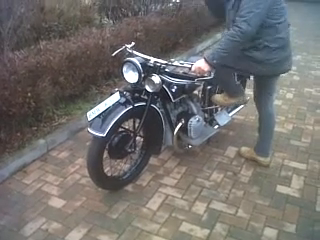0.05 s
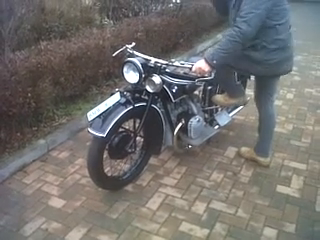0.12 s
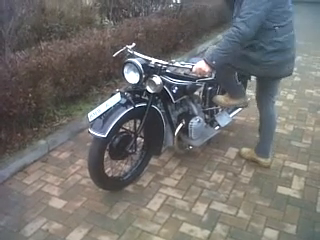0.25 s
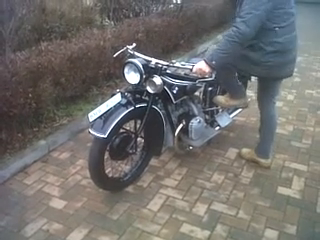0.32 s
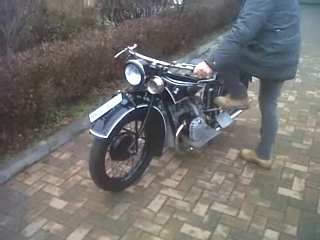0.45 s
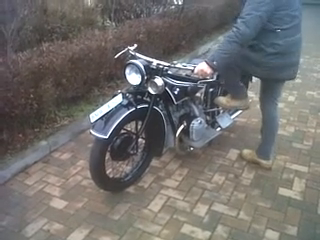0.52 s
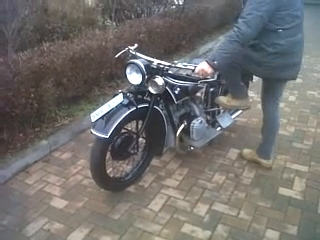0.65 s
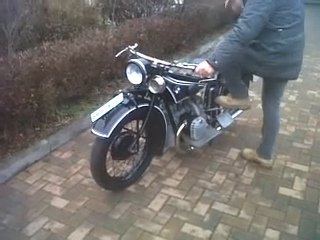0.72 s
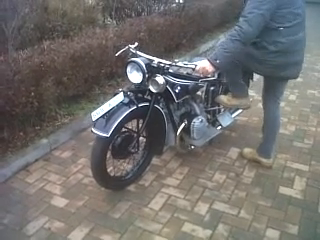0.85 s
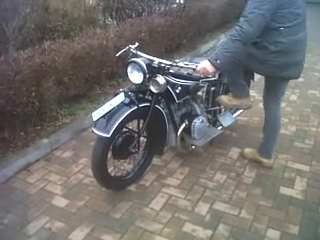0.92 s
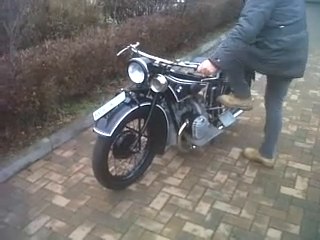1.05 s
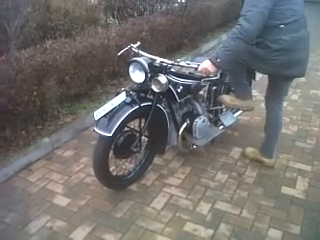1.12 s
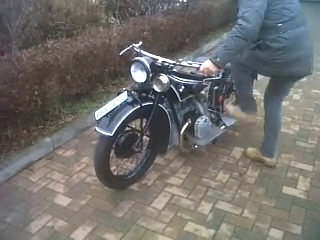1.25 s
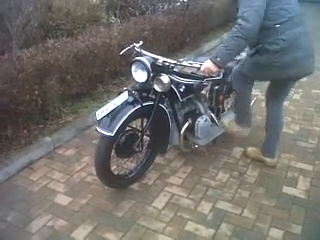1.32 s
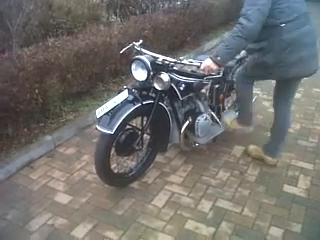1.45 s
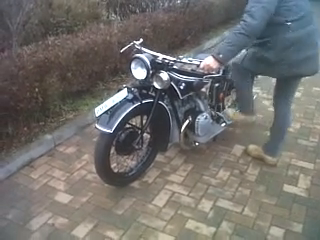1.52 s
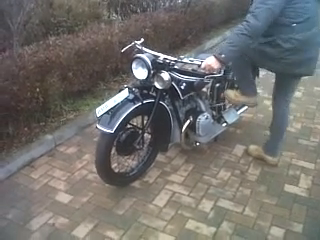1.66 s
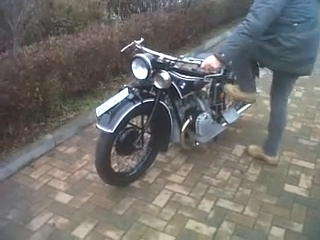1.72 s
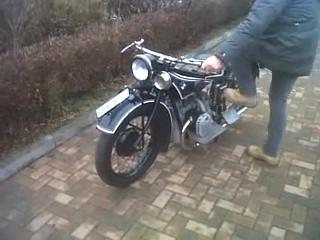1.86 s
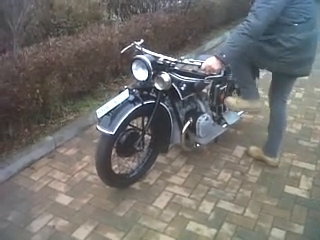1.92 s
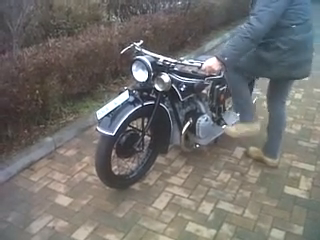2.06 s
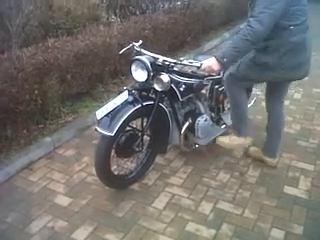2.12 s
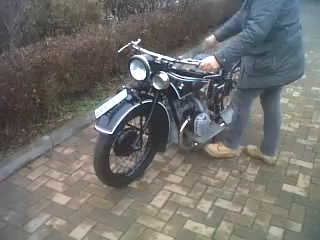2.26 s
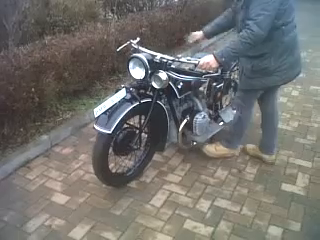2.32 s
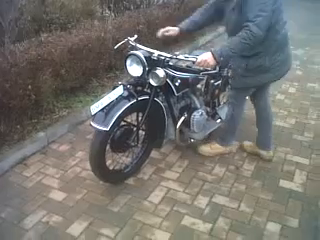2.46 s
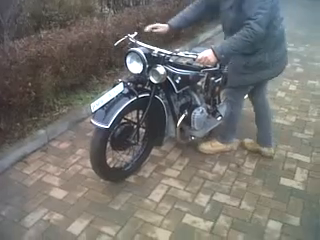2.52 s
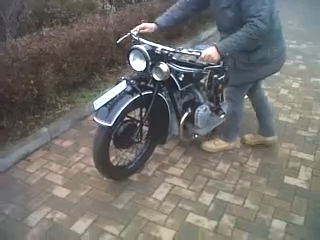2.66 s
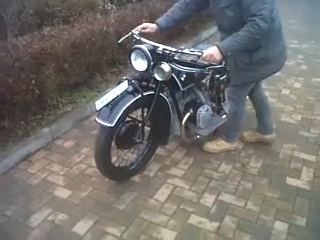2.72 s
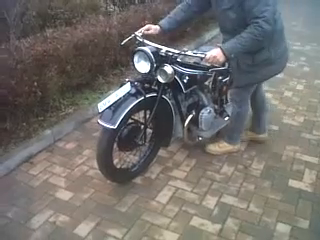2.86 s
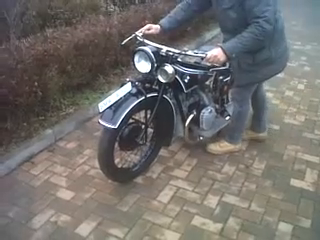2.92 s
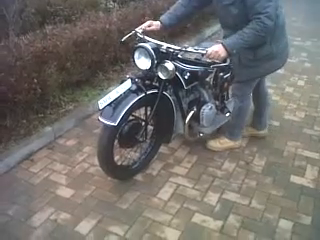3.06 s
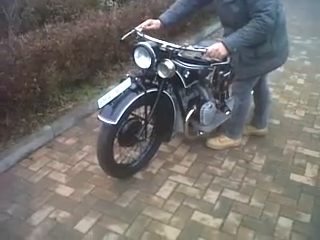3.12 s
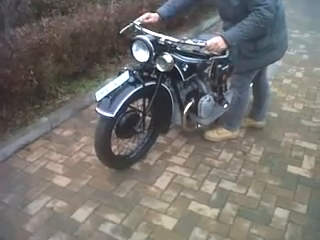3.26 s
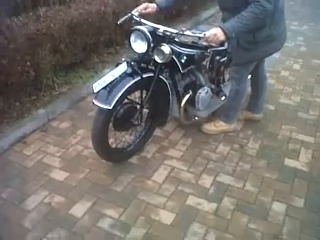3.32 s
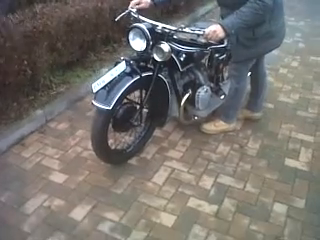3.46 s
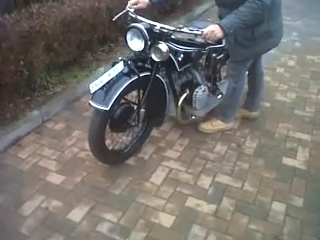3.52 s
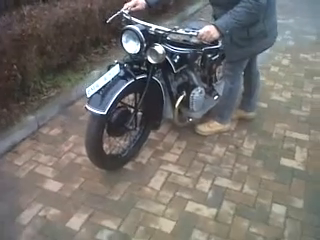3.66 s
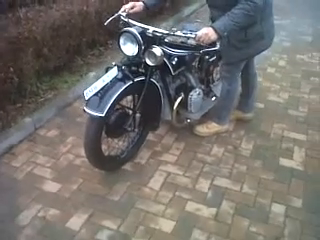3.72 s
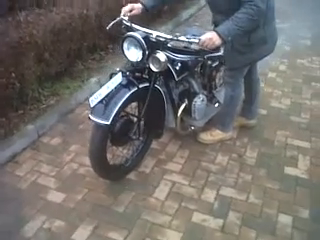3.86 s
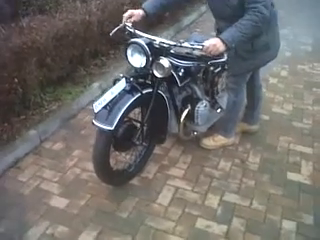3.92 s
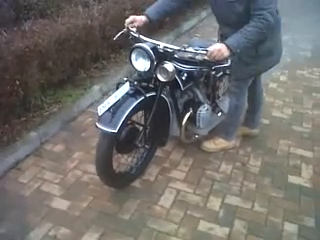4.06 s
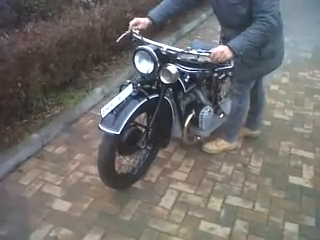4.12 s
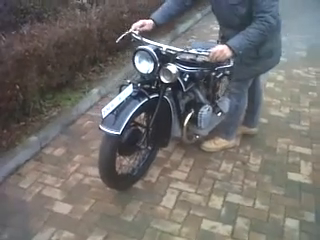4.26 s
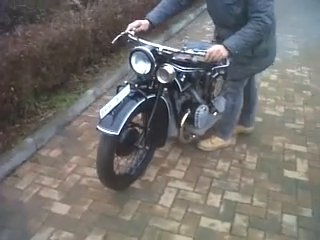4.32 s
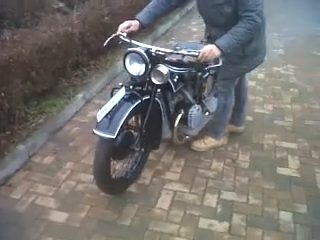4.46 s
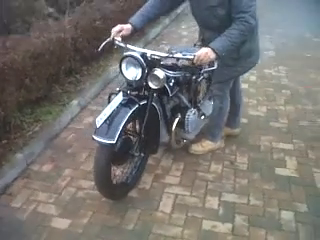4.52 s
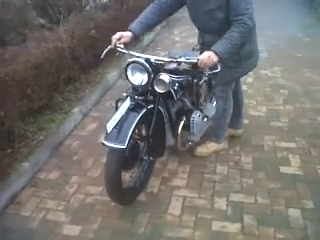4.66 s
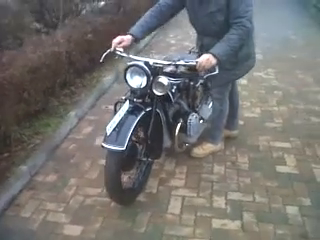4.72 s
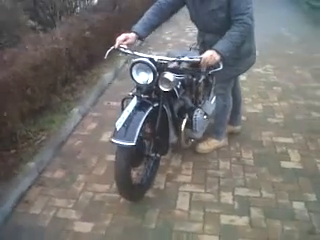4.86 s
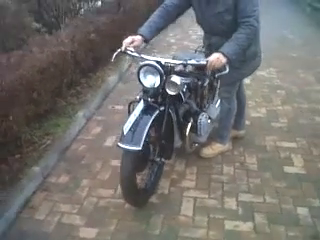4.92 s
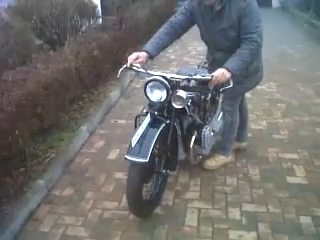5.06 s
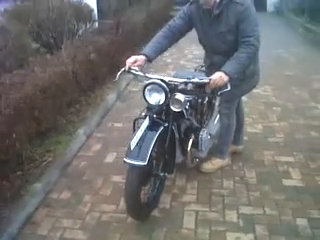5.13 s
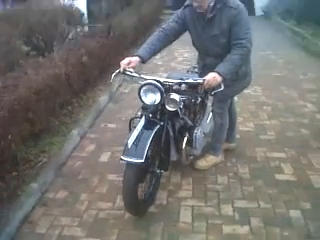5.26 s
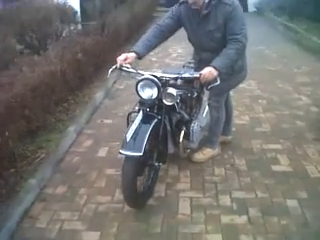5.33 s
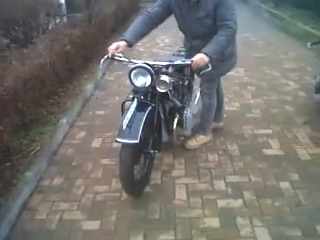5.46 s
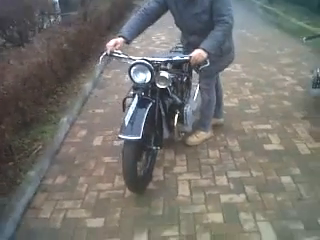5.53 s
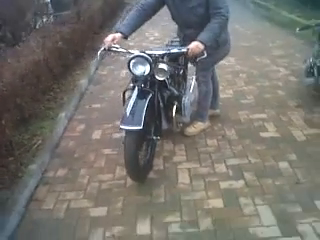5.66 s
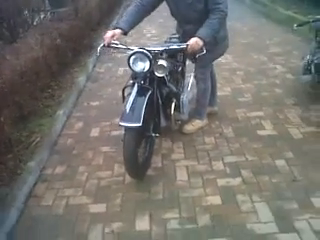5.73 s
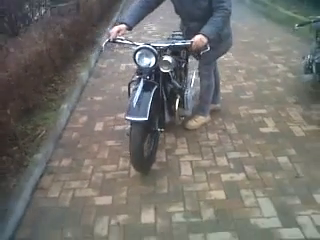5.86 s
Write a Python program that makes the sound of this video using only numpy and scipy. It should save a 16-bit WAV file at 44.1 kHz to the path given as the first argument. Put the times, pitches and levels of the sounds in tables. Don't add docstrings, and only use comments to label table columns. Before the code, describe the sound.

A kick-start clunk and ratchet whir lead to slow thumping exhaust puffs that quicken into two raspy revs with metallic clatter.

```python
import sys
import numpy as np
from scipy import signal
from scipy.fft import rfft, irfft
from scipy.io import wavfile
from scipy.ndimage import uniform_filter1d

SR = 44100
rng = np.random.default_rng(int(sys.argv[2]) if len(sys.argv) > 2 else 0)


def int16_out(signal):
    q = np.round(np.clip(np.atleast_2d(signal).T, -1, 1) * 32767)
    wavfile.write(sys.argv[1], SR, q.astype(np.int16))


def attenuation_scalar(level_db):
    decades = np.asarray(level_db, float) / 20
    return 10 ** decades


N = 259749

# (time [s], rate [strokes/s])
SPEED = [(1.5, 11.06), (2.04, 12.47), (2.36, 15.75), (2.77, 18.55), (2.771, 19.95), (3.26, 27.58),
         (3.64, 36.81), (3.8, 37.0), (4.09, 43.48), (4.23, 40.08), (4.39, 35.46), (4.52, 36.75),
         (4.8, 42.97), (4.82, 39.44), (4.98, 37.3), (5.32, 42.17), (5.46, 41.89), (5.89, 35.44)]
FIRST_STROKE_S, IDLE_PER_S = 1.4981, 39
# (time [s], echo level [dB])
BURN = [(1.5, -24.5), (1.7, -23.5), (2.05, -22), (2.35, -20), (2.75, -18), (2.9, -18), (3.3, -13.5),
        (3.6, -10.5), (4.1, -9.5), (4.7, -12.5), (5.2, -16), (5.89, -11)]
CATCHES_S = [3.673, 3.835, 3.938, 4.035, 4.439, 4.549, 4.652, 4.75, 5.005, 5.109, 5.21, 5.306, 5.45, 5.647,
             5.86]
FEEBLE_S = [2.235, 3.0, 3.237, 3.376, 3.501, 3.725, 4.491, 4.701, 5.156, 5.519, 5.546, 5.595, 5.62, 5.697,
            5.721, 5.75, 5.83]
HALF_BURNS_S = [3.563, 5.256, 5.352, 5.399, 5.495]
# (from [s], to [s])
COASTING = [
    (4.17, 4.42),
    (4.79, 4.96),
]
# (time [s], puff [dB], echo [dB])
BURN_DEVIATIONS = [(1.498, 1.5, 0.5), (1.675, 0.0, 1), (1.846, -3.5, 0.5), (2.01, -5.5, 1), (2.164, -1, 1),
                   (2.302, -2.5, 2), (2.429, 0.5, 0.5), (2.55, 1, 1), (2.664, 0.0, 0.5), (2.774, -2.5, 2.5),
                   (2.87, 3, 0.5), (2.96, 0.0, -1), (3.003, 5.5, -9), (3.045, 1, 1), (3.126, 5, -1.5),
                   (3.202, 2, -1), (3.239, 6, 0.5), (3.276, -0.5, 1), (3.345, 1.5, -0.5), (3.378, 2, 1.5),
                   (3.411, 0.5, 2.5), (3.473, 1.5, 1.5), (3.503, 2, 2), (3.533, 1.5, -0.5), (3.562, 1, 8),
                   (3.59, 1.5, 0.5), (3.645, -2, 0.5), (3.673, -0.5, -2.5), (3.7, 0.0, -1.5), (3.727, 2, -1),
                   (3.754, -1.5, -0.5), (3.808, -2.5, 1), (3.835, -1, -6), (3.861, 0.0, 1), (3.912, 4, 0.5),
                   (3.937, 2.5, 1), (3.962, 2, 0.0), (4.011, 4, 1), (4.035, 4.5, -2), (4.058, -3, -0.5),
                   (4.104, 1.5, -2), (4.151, -1, -3),
                   (4.439, -2, 1), (4.466, 1.5, -5), (4.494, 2, 1), (4.521, 1, -1.5), (4.548, 1, -2.5),
              (4.575, -3, 0.0), (4.626, 1.5, 3), (4.652, 2.5, -1), (4.677, 3.5, 2), (4.702, -4, -3.5),
              (4.726, 3, 1.5), (4.75, 2, -1), (4.774, -2.5, -0.5), (4.978, 3, 2), (5.004, 1, -2),
              (5.031, -6, 2.5), (5.083, -5, 3.5), (5.109, 0.5, 0.0), (5.134, 1, 0.5), (5.159, -3, 1.5),
              (5.184, 2.5, 4.5), (5.209, 2, -1.5), (5.233, 0.0, 0.5), (5.258, -5, 1), (5.282, 1.5, 2.5),
              (5.306, 3, -1), (5.33, -1, -2), (5.353, -7, 1.5), (5.377, 0.5, 2), (5.401, 0.0, -6.5),
              (5.425, 0.5, 1.5), (5.449, 3, -2), (5.472, 0.0, -0.5), (5.496, -1, 4.5), (5.521, 0.5, 1.5),
              (5.57, 1.5, -0.5), (5.62, -2, 0.0), (5.646, -0.5, -2), (5.671, -1, 2.5), (5.724, 4, -0.5),
              (5.777, -1.5, -1), (5.831, 3, -3), (5.859, -4, -3.5), (5.887, -1, -9)]
HALF_BURN_DB = -18.5
PUFF_OVER_ECHO_DB = -1.8
SLOW_BURN_DB, SLOW_PUFF_LOSS = -19.5, 0.43
FEEBLE_ECHO_DB, FEEBLE_PUFF_DB = -6, -28.5
UNBURNT_DB, UNBURNT_DB_PER_DECADE, FIRST_UNBURNT_DB = -21.5, 29.5, 6
COAST_ECHO_DB, NO_ECHO_DB = -27.5, -56.5
COAST_LAG_S, COAST_WIDER = .005, 1.05
COAST_PUFF_DB, COAST_FIRST_DB, COAST_SAG_DB_PER_S, LATE_COAST_DB = -15.5, 2, -12, -2.5

# (time [s], round trip [ms], late echoes [dB])
PIPE = [
    (1.5, 10.3, 3.5),
    (1.8, 11.0, 3.5),
    (2.65, 9.35, 3.5),
    (2.9, 8.27, -14.0),
    (3.3, 7.3, -14.0),
    (4.0, 6.82, -4.0),
    (4.6, 6.95, -4.0),
    (5.4, 6.92, -14.0),
    (5.89, 7.59, -14.0),
]
PUFF = [(-.1, .2, .45), (-.28, -.42, .11), (0, .85, .142), (-.02, .16, .06), (.42, -.44, .147),
        (1.09, -.31, .15), (1.62, .38, .146), (2.35, .12, .22)]
ECHOES = [(-.1, -.2, .45), (.67, -.51, .134), (1.03, .9, .168), (1.46, .52, .14), (1.86, .45, .163),
          (2.25, .49, .148), (2.81, .28, .19)]
# (frequency [cycles/round trip], level [dB], t60 [s])
SILENCER = [(1.5, -15, 0.19), (1.31, -18, 0.17), (1.9, -14.5, 0.11), (2.2, -4, 0.063), (0.99, -22.5, 0.75),
            (4.1, -22, 0.11), (1.2, -31, 0.017)]
# (frequency [cycles/round trip], level [dB], t60 [s])
PIPE_RING = (1.06, -13, .12)
# (time [s], silencer [dB], tailpipe bark [dB])
BEARING = [
    (1.5, -7, -30.5),
    (3.0, 9, -27),
    (3.4, 1, -14),
    (4.6, 3.5, -17),
    (5.1, 4.5, -11.5),
    (5.89, 1, -9.5),
]
# (frequency [Hz], level [dB], t60 [s])
TAILPIPE = [(636.5, -0.4, 0.053), (464.6, -4.5, 0.081), (377.3, -0.5, 0.052)]

# (time [s], level [dB])
THROTTLE = [(3.35, 0.5), (3.505, 12), (3.516, 22), (3.77, 22.5), (3.98, 24.5), (4.11, 20), (4.36, 14),
            (4.57, 8.5), (4.8, -0.5), (5.66, -4.5), (5.89, -10.5)]
# (time [s], level [dB])
STARTER = [
    (1.36, -23),
    (1.43, -14),
    (1.474, -3),
    (1.482, 20.5),
    (1.6, -2),
    (1.686, 14.5),
    (1.832, 8),
    (1.96, -0.5),
]
# (idle level [dB], slope [dB/decade of speed], throttle share [1], strain share [1])
LAYERS = [
    (-32.5, 21.5, 0.14, 0.42),
    (-36.5, 31, 0.26, 0.73),
    (-52.5, 26.5, 0.82, 0.7),
    (-56, 36.5, 0.14, .3),
]
# (frequency [Hz], density [dB/Hz])
RUMBLE = [(15, -36.5), (25, -4.5), (54, -26.5), (160, 0), (275, -2.5), (432, -9.5), (487, -9), (628, -13),
          (900, -21.5), (1170, -42), (1980, -120)]
# (frequency [Hz], density [dB/Hz])
ROAR = [(1120, -27), (1900, 2), (2210, 4.5), (2590, -6), (3110, -9.5), (3940, -6), (4220, -10), (4560, -18),
        (5520, -15.5), (6610, -34), (7270, -39.5), (9450, -71.5), (16000, -120)]
# (frequency [Hz], width [Hz], level [dB])
CASE = [(632, 103, -4.5), (877, 240, -1.5), (924.6, 55.3, 2.5), (982.6, 56, 0.5), (1133, 66, 0.5)]
# (frequency [Hz], width [Hz], level [dB])
COVER = [(1310, 203, 1.5), (1665, 108, 4.5), (1764, 45, 1), (1871, 67, -3)]
# (frequency [Hz], width [Hz], level [dB])
GEARS = [(2424, 120, 27), (3940, 63, 1.5), (5360, 170, 7.5), (6100, 62, -3.5), (6800, 590, -0.5)]
# (frequency [Hz], width [Hz], level [dB])
FINS = [(2080, 34, 1.5), (2196, 73, 3.5), (2390, 44, -2.5), (2637, 76, -5.5), (3000, 48, -10.5),
        (3095, 13, -9), (3410, 48, -6.5), (3620, 30, -9), (3800, 24, -10.5), (3960, 25, -6),
        (4520, 77, -9.5)]
FINS_DB = -1
# (frequency [Hz], width [Hz], level [dB])
TIMING = [(3690, 45, 2), (3834, 45, 1), (4410, 60, -6)]
# (time [s], level [dB])
TIMING_LEVEL = [(1.55, -77), (1.65, -66), (1.9, -62), (2.0, -67.5), (2.8, -65.5), (3.4, -61.5),
                (4.0, -54.5), (4.6, -67), (5.89, -68.5)]

# (time [s], peak [dB], cover share [dB])
KNOCKS = [(1.412, -45, -12), (1.478, -32, -7), (1.502, -20.5, -7), (1.514, -26, -21), (1.605, -33, -5.5),
          (1.78, -30, -28), (1.808, -43, -5), (1.834, -30, -12), (1.869, -35, -21), (1.894, -29, -16),
          (2.048, -31, -20), (2.127, -28.5, -11), (2.167, -39, -10), (2.276, -40, -24), (2.46, -23.5, -23),
          (2.523, -26, -9), (2.641, -29.5, -15), (2.746, -29, -14), (2.803, -23.5, -24), (2.84, -20, -17),
          (2.947, -22.5, -10.5), (3.026, -20, -10.5), (3.066, -29, -8), (3.101, -21, -23),
          (3.147, -26, -26), (3.259, -20.5, -8), (3.287, -17, -16), (3.395, -21.5, -10), (3.42, -15, -31),
          (3.456, -16.5, -10), (3.542, -13.5, -9), (3.577, -30.5, -13), (3.637, -21.5, -2),
          (3.774, -23, -18), (3.818, -11, -15.5), (3.905, -13, -18), (4.018, -7, -9), (4.095, -13, -8.5),
          (4.136, -16.5, 1), (4.209, -25.5, -15), (4.233, -15, -4.5), (4.284, -19, -4), (4.337, -13.5, -7),
          (4.421, -26, -9), (4.527, -14.5, -13.5), (4.612, -15.5, -12), (4.631, -12, -14),
          (4.718, -14, -12.5), (4.765, -16.5, -18), (4.861, -23, -9), (4.941, -26, -19), (5.088, -16, -33),
          (5.169, -17.5, -13.5), (5.319, -42, -10), (5.461, -22.5, -8), (5.49, -30, 1), (5.609, -41, -5),
          (5.69, -24, -21), (5.758, -28, -24), (5.842, -23, -25),
          (1.426, -54, -15),
    (1.441, -39, -3),
    (1.448, -49, -10),
    (1.464, -44, -11),
    (1.536, -38, -10),
    (1.551, -40, -11),
]
KNOCK_SMEAR_S = .005
# (time [s], peak [dB])
KICK = [
    (1.465, -53),
    (1.4775, -33),
    (1.486, -40.5),
    (1.506, -45.5),
    (1.52, -49.5),
    (1.545, -60),
    (3.288, -28.5),
]
# (frequency [Hz], level [dB], t60 [s])
FRAME = [(192.4, 6, 0.044), (345, 2.5, 0.11), (410, -3.5, 0.17), (557, -6, 0.25), (760, 9.5, 0.038)]

# (time [s], peak [dB], brightness [dB])
VALVE = [(1.407, -48, -21), (1.4783, -44, -16), (1.502, -26.5, -23.5), (1.6075, -42.5, -30),
         (1.9744, -26, -26), (2.0102, -43, -14), (2.1265, -34, -28), (2.3025, -39.5, -14),
         (2.4562, -37.5, -16), (3.5736, -29, -9), (2.0464, -41.5, -13), (2.167, -46, -11),
         (2.2018, -36, -21), (2.4024, -29, -52.5), (3.7948, -36, -1), (4.4175, -21, -21)]
# (frequency [Hz], level [dB], t60 [s])
TAPPET = [(1783, 2.5, 0.027), (1648, 4.5, 0.014), (2420, -19, 0.018)]
# (frequency [Hz], width [Hz], level [dB])
ROCKER = [(2340, 1300, 5.5), (3100, 660, 8), (3840, 160, 6), (4260, 400, 6), (5430, 1500, -3.5),
          (6550, 600, -31)]
# (from [s], to [s])
VALVE_SPAN_S = (2.1, 3.6)
VALVE_LEAD_STROKES = .48
VALVE_DB, VALVE_DB_PER_DECADE, VALVE_BRIGHT_DB, VALVE_SPREAD_DB = -27, 28, -17, 1.5
WARM_LOSS_DB, WARM_BRIGHT_DB = -13, 1.5
REV_TICK_SHARE = 0.3
# (time [s], peak [dB])
PUSHROD = [(4.609, -42), (4.71, -61), (4.7514, -56), (4.8558, -58), (4.9155, -51), (4.9607, -51.5),
           (5.0188, -50), (5.042, -53), (5.0692, -44.5), (5.0992, -44), (5.1262, -43), (5.149, -40.5),
           (5.1714, -41.5), (5.2203, -42.5), (5.2684, -43.5), (5.318, -47), (5.366, -46), (5.39, -43),
           (5.4264, -46), (5.4752, -48), (5.5821, -57), (5.6075, -58), (5.6925, -48), (5.811, -60)]
# (frequency [Hz], width [Hz], level [dB])
HEAD = [(5290, 350, -5), (5760, 150, -27), (5950, 370, -11.5)]

# (time [s], rate [teeth/s], level [dB])
RATCHET = [
    (1.58, 190, -68),
    (1.63, 160, -36.5),
    (1.7, 168, -38),
    (1.8, 155, -39),
    (1.89, 140, -32.5),
    (1.94, 84, -58),
]
# (frequency [Hz], width [Hz], level [dB])
RATCHET_BODY = [(930, 56, 0), (1027, 82, -2), (1120, 25, 3.5), (1450, 150, -11.5), (1770, 84, -6.5),
                (2250, 470, -23.5), (2766, 130, -18.0), (2980, 300, -24.5), (3650, 95, -22),
                (3800, 60, -23.5), (4360, 75, -27.5), (5670, 290, -35)]
# (time [s], frequency [Hz], level [dB])
PANEL = [
    (2.78, 410, -60),
    (2.9, 414, -43),
    (3.06, 417, -38),
    (3.3, 422, -42),
    (3.5, 428, -45),
    (3.58, 430, -60),
]
# (frequency [Hz], level [dB], t60 [s])
SPRING = [
    [(.62, -64)],
    [(483, 1.5, 0.42)],
]
# (frequency [Hz], density [dB/Hz])
TRAFFIC = [(15, -68), (25, -24), (66, 5), (119, -2.5), (169, -8.5), (444, -10.5), (488, -15.5),
           (536, -12.5), (1090, -12.5), (1590, -21), (7000, -39.5), (9100, -75), (15400, -120)]
TRAFFIC_DB = -62.5

CUTOFF_HZ = 7500
# (from [s], to [s], above [Hz])
DROPOUTS = [(1.535, 1.56, 4300), (1.555, 1.59, 3300), (2.05, 2.065, 4700), (2.065, 2.105, 4200),
            (2.175, 2.23, 4700), (2.3, 2.325, 5200), (2.34, 2.36, 5600), (2.48, 2.49, 5700),
            (2.555, 2.61, 5600), (2.685, 2.735, 4500), (2.81, 2.835, 5200), (3.075, 3.1, 4700),
            (3.36, 3.385, 5200), (3.49, 3.52, 6000), (3.97, 3.99, 5800)]
DROPOUT_KEEP_DB = 2
TOP_KEEP_DB, TOP_FROM_HZ = -38.5, 6000


def exhaust():
    lead, length, head_length = 400, 9000, 2600
    out, t = np.zeros(N + length), (np.arange(length) - lead) / SR
    pipe_s, trip_ms, late_db = np.transpose(PIPE)
    bearing_s, silencer_db, _ = np.transpose(BEARING)
    rows = strokes()
    chance = rng.standard_normal((len(rows), len(SILENCER), 2))
    for (s, peak_db, echo_db), own in zip(rows, chance):
        trips = t / np.interp(s, pipe_s, trip_ms) * 1000
        late = attenuation_scalar(np.interp(s, pipe_s, late_db))
        wider = COAST_WIDER if echo_db == COAST_ECHO_DB else 1
        wave, head = np.zeros(length), trips[:head_length]
        for delay, height, width in PUFF:
            wave[:head_length] += attenuation_scalar(peak_db) * height * puff(head - delay * wider, width * wider)
        for k, (delay, height, width) in enumerate(ECHOES):
            gain = late if k > 2 else 1
            wave[:head_length] += attenuation_scalar(echo_db) * height * gain * puff(head - delay, width)
        after = np.maximum(trips - 1.5, 0)
        for (cycles, mode_db, t60), (detune, strength) in zip(SILENCER, own):
            fade = attenuation_scalar(-60 * np.maximum(t, 0) / t60) * np.minimum(3 * after, 1) / (1 + late)
            level_db = min(echo_db, -10) + mode_db + np.interp(s, bearing_s, silencer_db) + 6 + 2.0 * strength
            wave += attenuation_scalar(level_db) * fade * np.sin(2 * np.pi * cycles * (1 + .02 * detune) * after)
        cycles, ring_db, t60 = PIPE_RING
        if echo_db < peak_db - 8:
            fade = attenuation_scalar(peak_db + ring_db - 60 * np.maximum(t, 0) / t60) * np.clip(trips + 1.2, 0, 1)
            wave += fade * np.cos(2 * np.pi * cycles * trips)
        start = round(s * SR) - lead
        out[start:start + length] += wave
    return out[:N]


def puff(t, width):
    return (1 - (t / width) ** 2) * np.exp(-(t / width) ** 2 / 2)


def strokes():
    t, turned, speed = crank()
    count = np.arange(int(turned[-1]) + 1)
    s, first = np.interp(count, turned, t), count % 2 == 0

    def among(times_s):
        return np.abs(s[:, None] - times_s).min(axis=1) < .008

    coasting = np.any([(s > a) & (s < b) for a, b in COASTING], axis=0)
    burn_db = np.interp(s, *np.transpose(BURN)) + HALF_BURN_DB * among(HALF_BURNS_S)
    slow_loss_db = SLOW_PUFF_LOSS * np.minimum(burn_db - SLOW_BURN_DB, 0) * (count > 0)
    puff_db = burn_db + PUFF_OVER_ECHO_DB + slow_loss_db
    unburnt_db = UNBURNT_DB + UNBURNT_DB_PER_DECADE * np.interp(s, t, speed) + FIRST_UNBURNT_DB * first
    since_s = np.min([np.where(s > a, s - a, 9) for a, b in COASTING], axis=0)
    coast_db = COAST_PUFF_DB + COAST_FIRST_DB * first + COAST_SAG_DB_PER_S * since_s
    coast_db = coast_db + LATE_COAST_DB * (s > COASTING[1][0])
    kinds = [among(FEEBLE_S), coasting, first | among(CATCHES_S + HALF_BURNS_S)]
    peak_db = np.select(kinds, [puff_db + FEEBLE_PUFF_DB, coast_db, puff_db], unburnt_db)
    echo_db = np.select(kinds, [burn_db + FEEBLE_ECHO_DB, COAST_ECHO_DB, burn_db], NO_ECHO_DB)
    own_s, own_puff_db, own_echo_db = np.transpose(BURN_DEVIATIONS)
    listed = np.abs(s[:, None] - own_s) < .008
    peak_db, echo_db = peak_db + listed @ own_puff_db, echo_db + listed @ own_echo_db
    return np.c_[s + COAST_LAG_S * coasting, peak_db, echo_db]


def crank():
    step_s = .0005
    t = np.arange(FIRST_STROKE_S, N / SR, step_s)
    per_s = np.interp(t, *np.transpose(SPEED))
    return t, (np.cumsum(per_s) - per_s[0]) * step_s, np.log10(per_s / IDLE_PER_S)


def bark():
    s, peak_db, echo_db = np.transpose(strokes()[:-1])
    at_s, _, bark_db = np.transpose(BEARING)
    level_db = np.minimum(peak_db, echo_db) + np.interp(s, at_s, bark_db)
    return strike(np.c_[s - .002, level_db], TAILPIPE, 0.0001)


def engine_noise():
    t = np.arange(N) / SR
    on = np.clip((t - 1.3) / 0.12, 0, 1) ** 2
    early = np.clip((t - 1.46) / .04, 0, 1)
    case_db, cover_db, roar_db, gear_db = layer_levels()
    flow = gas_flow(.22)
    throb = ((flow + 0.00089) / uniform_filter1d(flow + 0.0055, size=8000)) ** 0.26
    rumble = attenuation_scalar(-23.5) * (flow + .07 * early) * coloured(RUMBLE)
    shake = attenuation_scalar(0.81 * drift(30))
    case = attenuation_scalar(case_db + 0.44 * drift(40)) * rms_one(resonate(grains(2500, 2.15), CASE))
    cover = attenuation_scalar(cover_db + 0.39 * drift(40)) * rms_one(resonate(grains(2500, 2.8), COVER))
    flutter = 1 + 0.15 * uniform_filter1d(np.abs(grains(640, 2.6)), size=60) * 60
    roar = attenuation_scalar(roar_db + 0.59 * drift(45)) * throb * coloured(ROAR) * flutter
    teeth = grains(5000, 2.5)
    gears = attenuation_scalar(gear_db + 7.0 + 2 * drift(25)) * throb * rms_one(resonate(teeth, GEARS))
    fins = attenuation_scalar(roar_db + FINS_DB + 1.6 * drift(33)) * throb * rms_one(resonate(grains(3000, 5.1), FINS))
    timing = attenuation_scalar(in_time(TIMING_LEVEL)[0] + 2.0 * drift(17)) * rms_one(resonate(teeth, TIMING))
    return on * (rumble + shake * (case + cover + roar + gears + fins + timing))


def layer_levels():
    t, _, speed = crank()
    speed = np.interp(np.arange(N) / SR, t, speed)
    (throttle_db,), (strain_db,) = in_time(THROTTLE), in_time(STARTER)
    return [idle_db + slope_db * speed + opened * throttle_db + strained * strain_db
            for idle_db, slope_db, opened, strained in LAYERS]


def gas_flow(t60):
    s, peak_db, echo_db = np.transpose(strokes())
    jumps = np.zeros(N)
    jumps[(s * SR).astype(int)] = attenuation_scalar(np.minimum(echo_db, -10)) + .3 * attenuation_scalar(peak_db)
    return uniform_filter1d(signal.lfilter([1], [1, -attenuation_scalar(-60 / (t60 * SR))], jumps), size=200)


def knocks():
    s, peak_db, cover_db = np.transpose(KNOCKS)
    case = [(hz, level_db, 2.11 / width) for hz, width, level_db in CASE]
    cover = [(hz, level_db, 4.2 / width) for hz, width, level_db in COVER]
    on_case = strike(np.c_[s - .001, peak_db - 6.5], case, 0.0018, KNOCK_SMEAR_S)
    on_cover = strike(np.c_[s - .001, peak_db + cover_db - 6.5], cover, 0.0032, KNOCK_SMEAR_S)
    return on_case + on_cover + strike(KICK, FRAME, 0.00015)


def valve():
    s, peak_db, bright_db = np.transpose(closings())
    crack = crackle(s, peak_db + bright_db + 4.5, 0.056, 260)
    return strike(np.c_[s, peak_db - 2], TAPPET, 0.00063) + resonate(crack, ROCKER)


def closings():
    t, turned, speed = crank()
    s = np.interp(np.arange(2, turned[-1], 2) - VALVE_LEAD_STROKES, turned, t)
    s = s[s > VALVE_SPAN_S[0]]
    warm = s > VALVE_SPAN_S[1]
    throttle_db = np.interp(s, *np.transpose(THROTTLE))
    peak_db = VALVE_DB + VALVE_DB_PER_DECADE * np.interp(s, t, speed)
    peak_db = peak_db + (WARM_LOSS_DB + REV_TICK_SHARE * throttle_db) * warm
    peak_db = peak_db + VALVE_SPREAD_DB * rng.standard_normal(len(s))
    return np.r_[VALVE, np.c_[s, peak_db, VALVE_BRIGHT_DB + WARM_BRIGHT_DB * warm]]


def pushrods():
    s, peak_db = np.transpose(PUSHROD)
    return 30 * resonate(crackle(s, peak_db - 20.0, 0.045, 150), HEAD)


def ratchet():
    per_s, _ = in_time(RATCHET)
    turns = np.floor(np.cumsum(per_s * (1 + 0.088 * drift(80))) / SR)
    clicks = np.diff(turns, prepend=0) * attenuation_scalar(4 * (turns % 2) + 2 * rng.standard_normal(N))
    scrape = uniform_filter1d(clicks, size=110) * (1.2 + rng.standard_normal(N))
    return attenuation_scalar(in_time(RATCHET, before=-120)[1]) * rms_one(resonate(scrape, RATCHET_BODY))


def panel():
    hz, _ = in_time(PANEL)
    level_db = in_time(PANEL, before=-120)[1] + 1 + 3 * drift(30)
    return attenuation_scalar(level_db) * np.sin(2 * np.pi * np.cumsum(hz) / SR)


def stand_spring():
    return strike(*SPRING, .004)


def paving_echo(metal):
    late = np.r_[np.zeros(170), metal][:N]
    return attenuation_scalar(-24.0) * signal.lfilter([.3], [1, -.7], late)


def traffic():
    return attenuation_scalar(TRAFFIC_DB + 0.87 * drift(2.1)) * coloured(TRAFFIC)


def strike(events, modes, contact_s, smear_s=0):
    out, t = 0, np.arange(300) / SR / contact_s
    touch = t * np.exp(-t) / np.sum(t * np.exp(-t))
    for hz, mode_db, t60 in modes:
        force, own = np.full(N, 1e-18), rng.standard_normal((len(events), 2))
        for (s, peak_db), (strength, phase) in zip(events, own):
            shake = np.cos(2 * np.pi * hz * t * contact_s + 3 * phase)
            lag_s = smear_s * (s > 2.2) * (min(abs(phase), 2) - .5)
            push = 2 * attenuation_scalar(peak_db + mode_db + 2.0 * strength) * touch * shake
            force[round((s + lag_s) * SR):][:300] += push
        r, w = attenuation_scalar(-60 / (t60 * SR)), 2 * np.pi * hz / SR
        out = out + signal.lfilter([0, np.sin(w)], [1, -2 * r * np.cos(w), r * r], force)
    return out


def crackle(s, level_db, t60, onset_samples):
    jolts = np.zeros(N)
    jolts[(s * SR).astype(int)] = attenuation_scalar(level_db)
    soft = uniform_filter1d(jolts, size=onset_samples) * 2
    return signal.lfilter([1], [1, -attenuation_scalar(-60 / (t60 * SR))], soft) * rng.standard_normal(N)


def resonate(x, peaks):
    out = 0
    for k, (hz, width, level_db) in enumerate(peaks):
        r = np.exp(-np.pi * width / SR)
        top = attenuation_scalar(level_db) * (-1) ** k * (1 - r * r) / 2
        poles = [1, -2 * r * np.cos(2 * np.pi * hz / SR), r * r]
        out = out + signal.lfilter([top, 0, -top], poles, x + 1e-18)
    return out


def grains(per_s, spread_db):
    when, size, sign = rng.random((3, N))
    return (when < per_s / SR) * attenuation_scalar(-spread_db * np.log(size + 0.0013)) * np.sign(sign - .5)


def coloured(spectrum):
    hz, level_db = np.transpose(spectrum)
    grid_hz = np.maximum(np.fft.rfftfreq(N, 1 / SR), 1)
    gain = attenuation_scalar(np.interp(np.log(grid_hz), np.log(hz), level_db))
    return rms_one(irfft(rfft(rng.standard_normal(N)) * gain, N))


def rms_one(x):
    return x / np.sqrt(np.mean(x ** 2) + 1e-20)


def in_time(rows, before=None):
    s, *columns = np.transpose(rows)
    return [np.interp(np.arange(N) / SR, s, c, left=before, right=before) for c in columns]


def drift(rate):
    knots = rng.standard_normal(int(N / SR * 200) + 2)
    return np.interp(np.arange(N) / SR * min(rate, 150), np.arange(len(knots)), knots)


def scene():
    metal = engine_noise() + knocks() + valve() + pushrods() + ratchet() + panel() + stand_spring()
    return (exhaust() + bark() + metal + paving_echo(metal) + traffic())[None]


def drop_weak_treble(x):
    hz, s, lines = signal.stft(x, SR, window="cosine", nperseg=1024)
    power = np.abs(lines) ** 2
    middle = power[..., (hz > 500) & (hz < 2000), :].mean(axis=-2)
    hz = hz[:, None]
    keep = (hz < TOP_FROM_HZ) | (uniform_filter1d(power, size=4, axis=-2) > attenuation_scalar(2 * TOP_KEEP_DB) * middle)
    band = uniform_filter1d(power, size=40, axis=-2)
    strong = uniform_filter1d(power, size=3, axis=-2) > attenuation_scalar(2 * DROPOUT_KEEP_DB) * band
    for from_s, to_s, above_hz in DROPOUTS:
        keep &= strong | (hz < above_hz) | (s < from_s) | (s > to_s)
    return signal.istft(lines * keep, SR, window="cosine", nperseg=1024)[1][..., :N]


def low_pass(x):
    return signal.sosfilt(signal.butter(12, 7420, fs=SR, output="sos"), x)


def record(dry):
    thin = signal.sosfilt(signal.butter(1, 40, "high", fs=SR, output="sos"), dry)
    rounded = 0.57 * np.tanh(thin / 0.6)
    cut = signal.sosfilt(signal.cheby2(12, 60, CUTOFF_HZ + 400, fs=SR, output="sos"), rounded)
    mix = drop_weak_treble(cut)
    return low_pass(mix)


dry = scene()
out = record(dry)
int16_out(out)
```